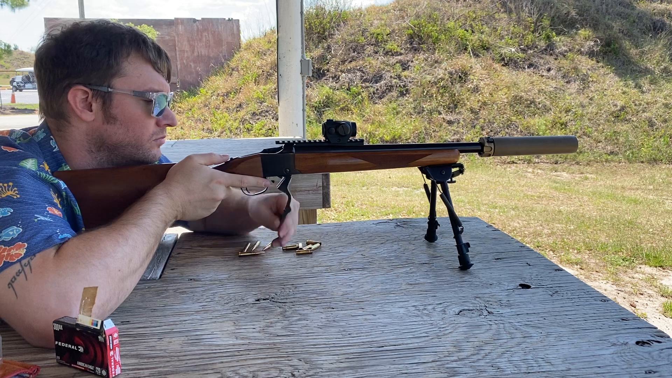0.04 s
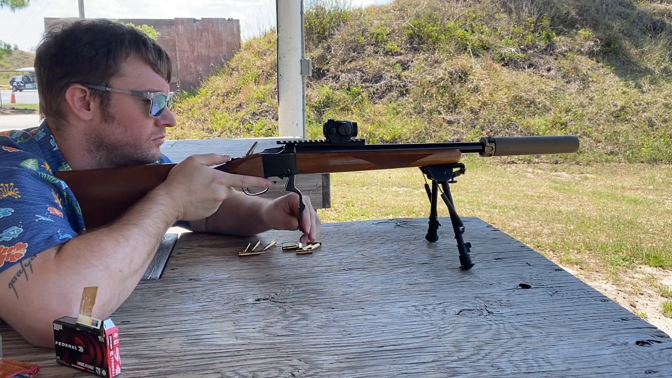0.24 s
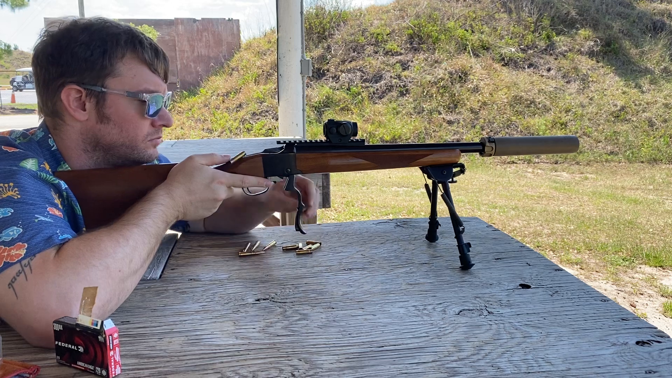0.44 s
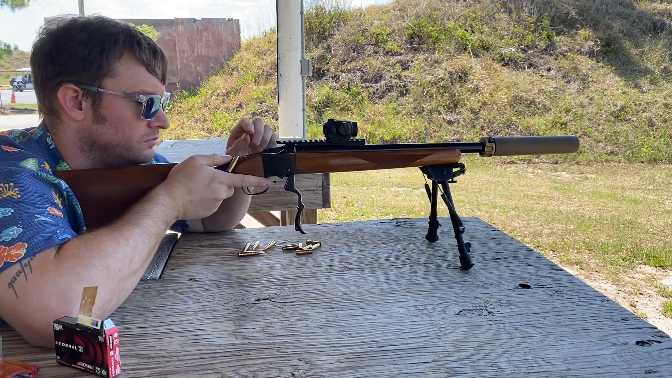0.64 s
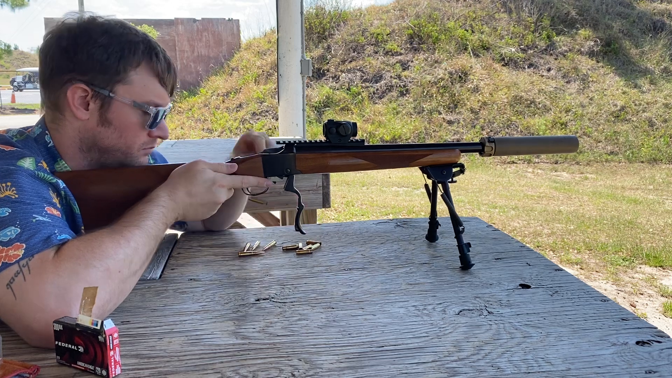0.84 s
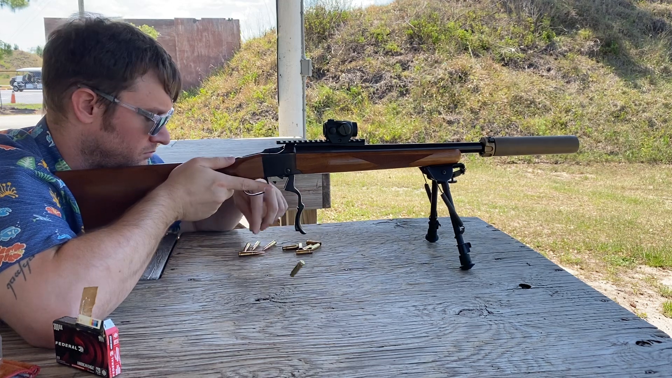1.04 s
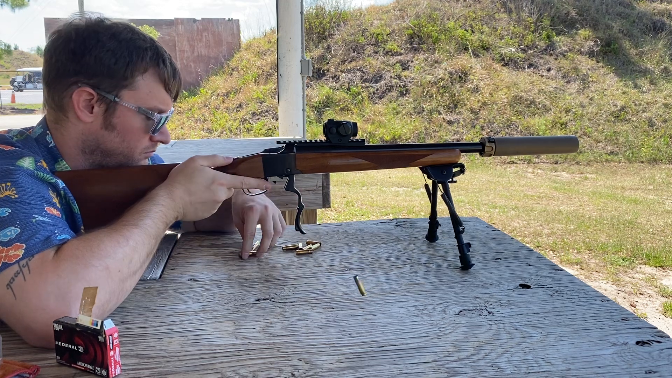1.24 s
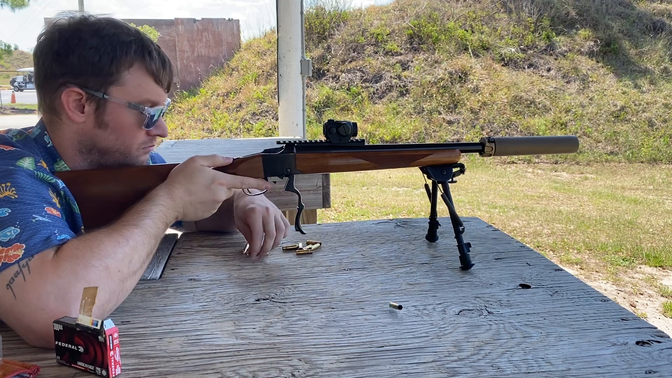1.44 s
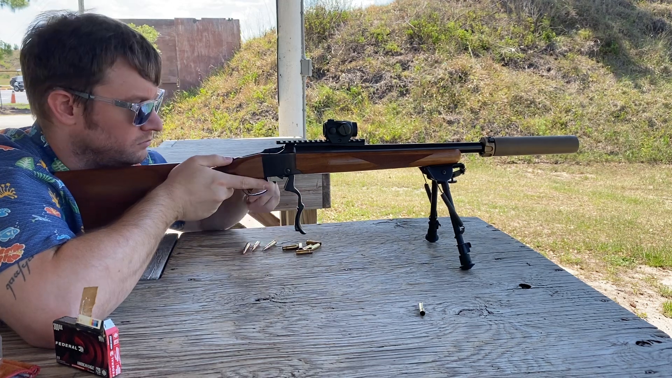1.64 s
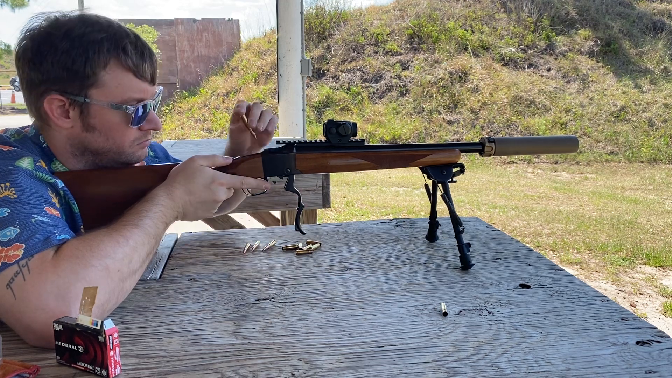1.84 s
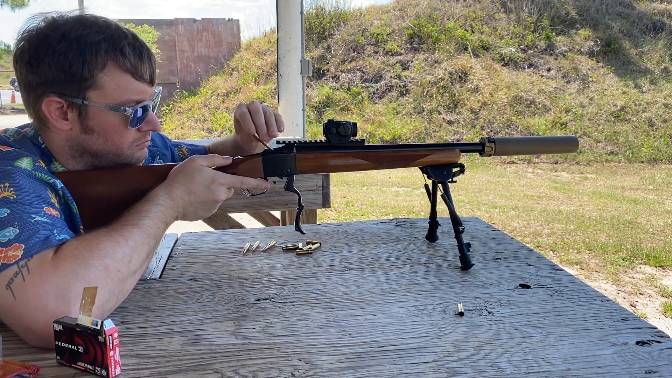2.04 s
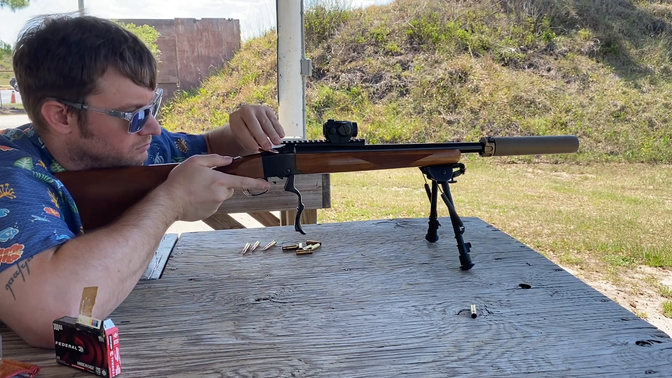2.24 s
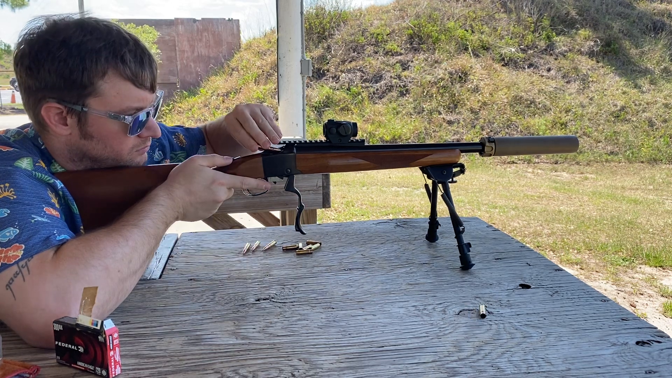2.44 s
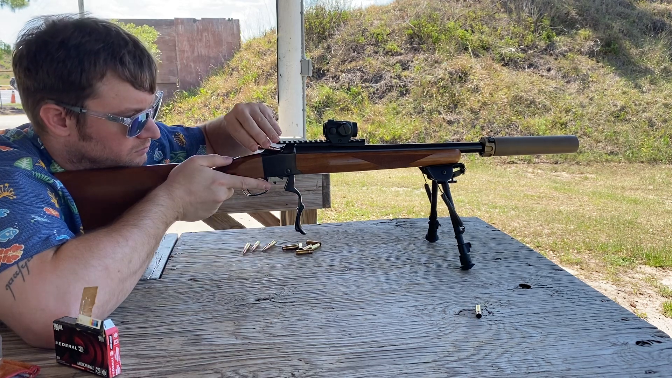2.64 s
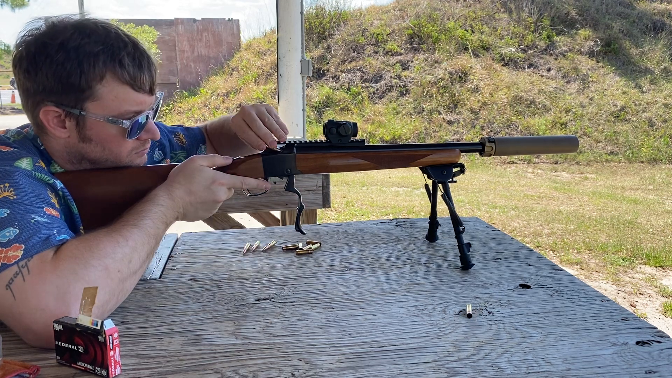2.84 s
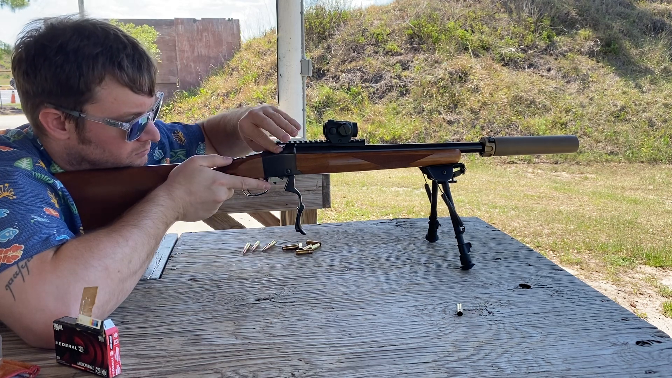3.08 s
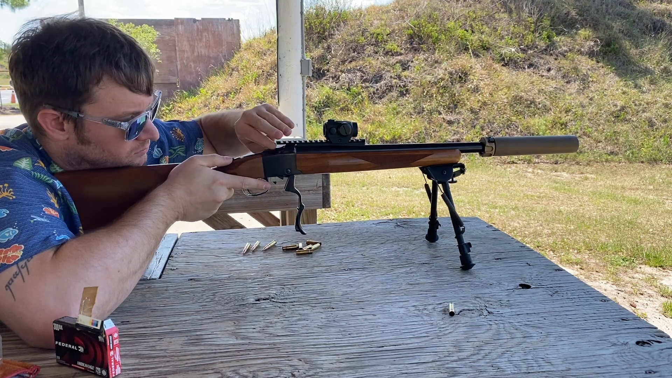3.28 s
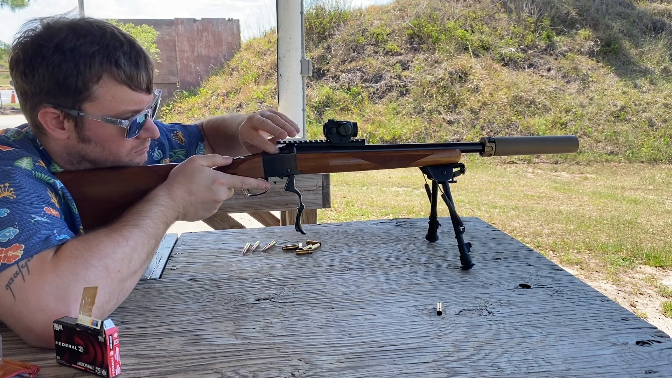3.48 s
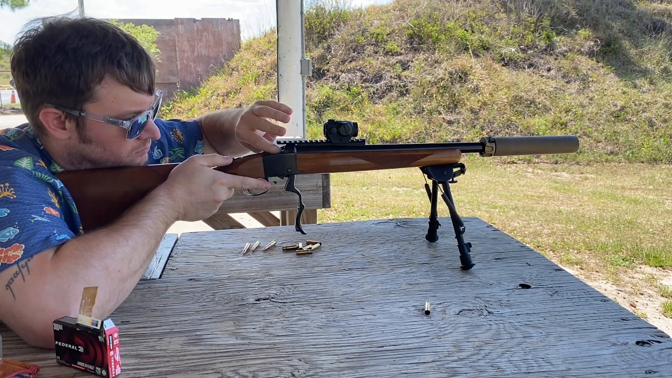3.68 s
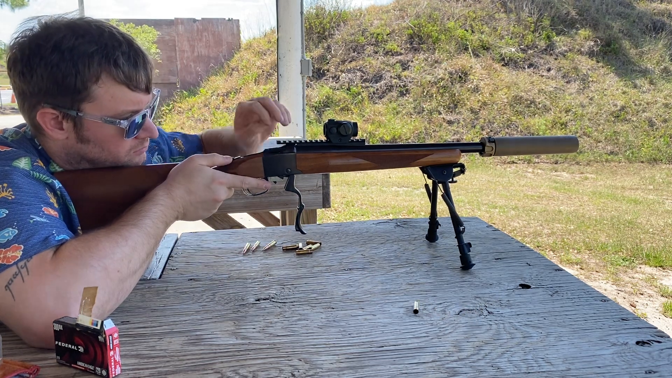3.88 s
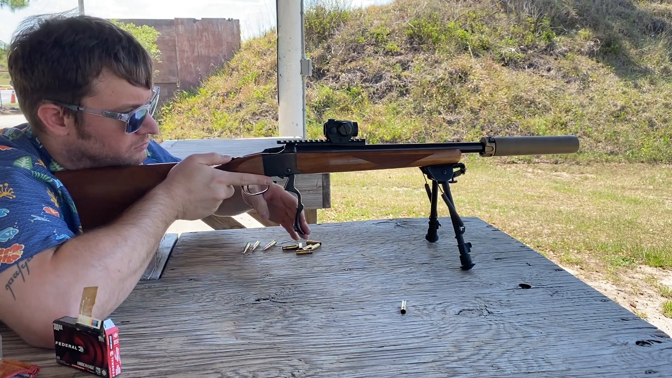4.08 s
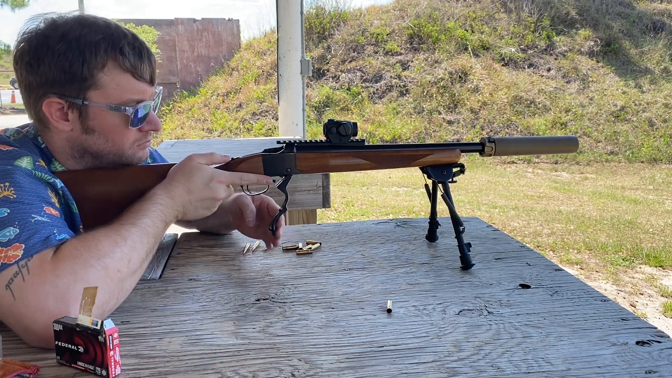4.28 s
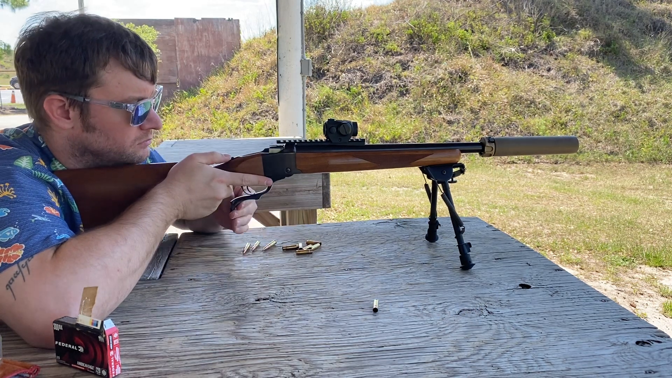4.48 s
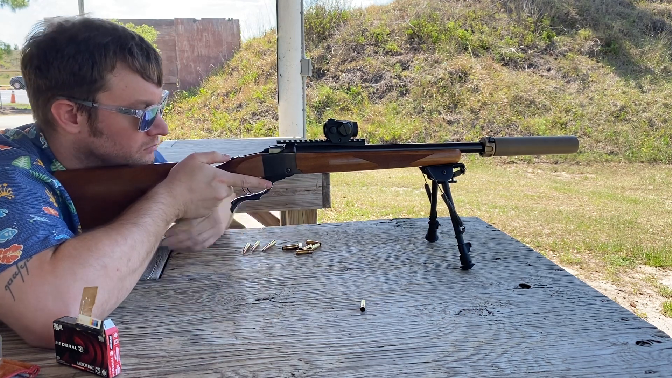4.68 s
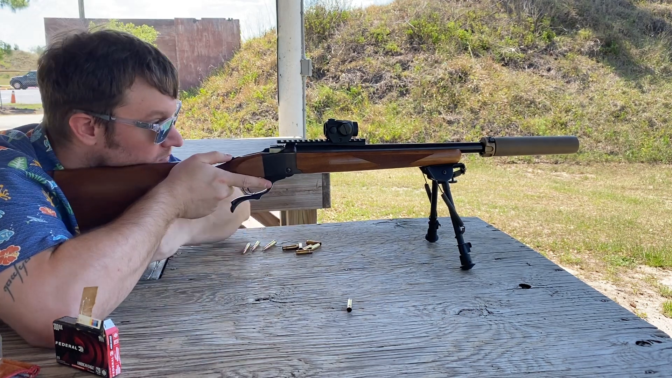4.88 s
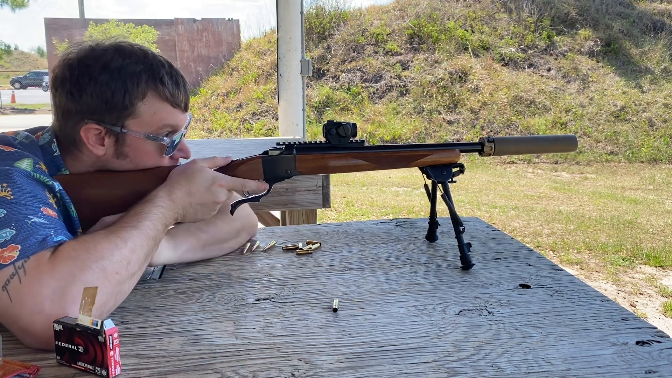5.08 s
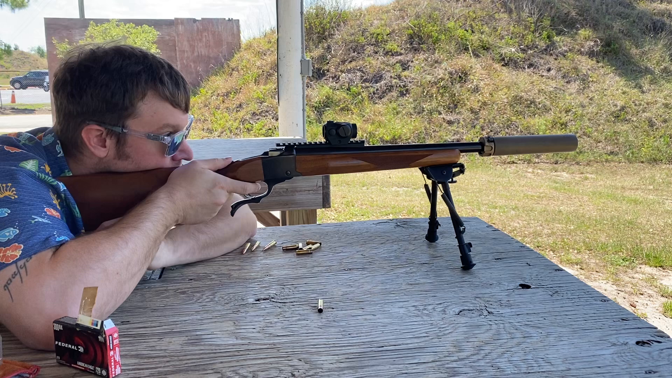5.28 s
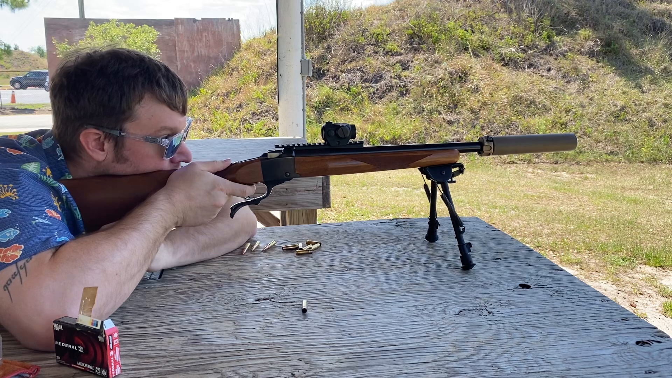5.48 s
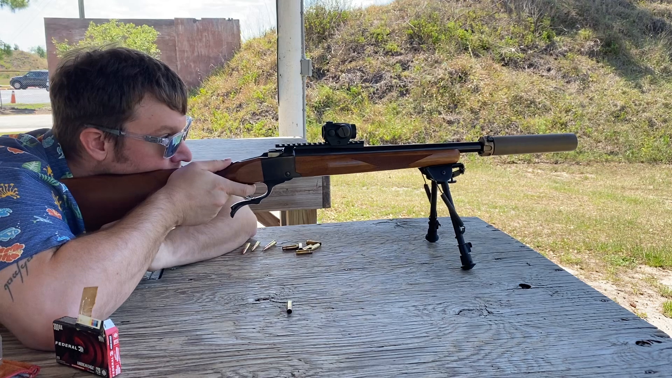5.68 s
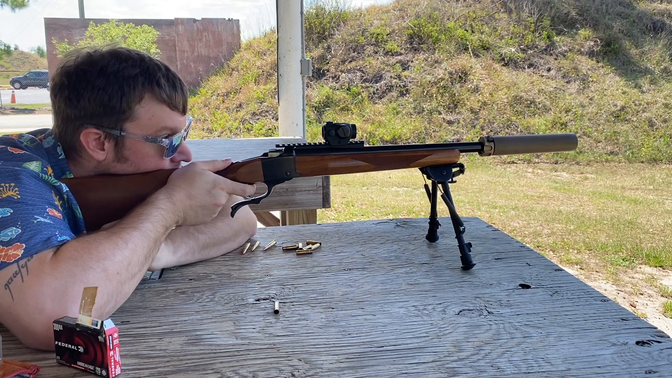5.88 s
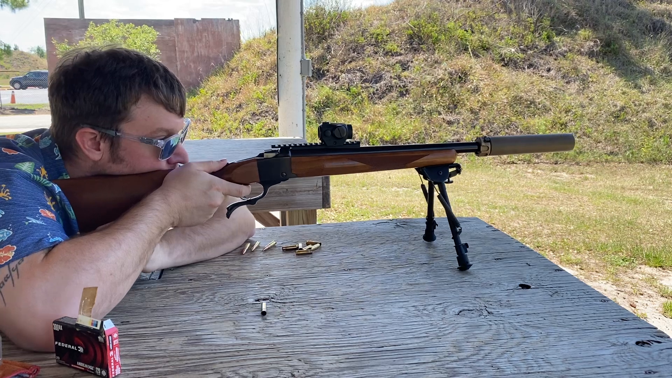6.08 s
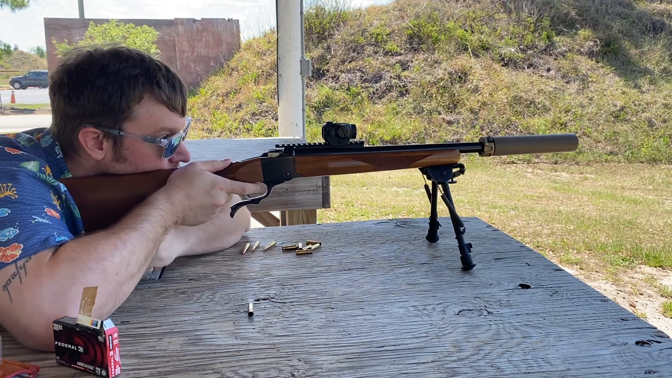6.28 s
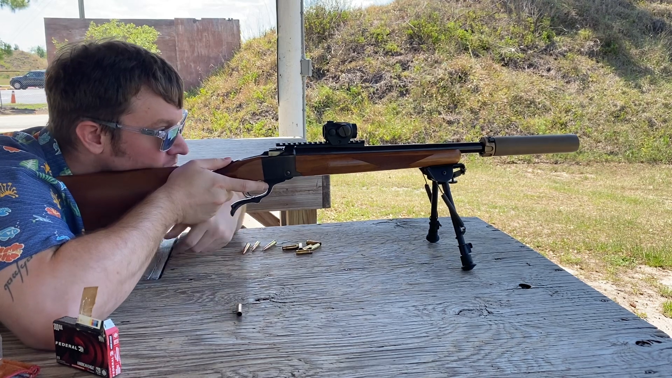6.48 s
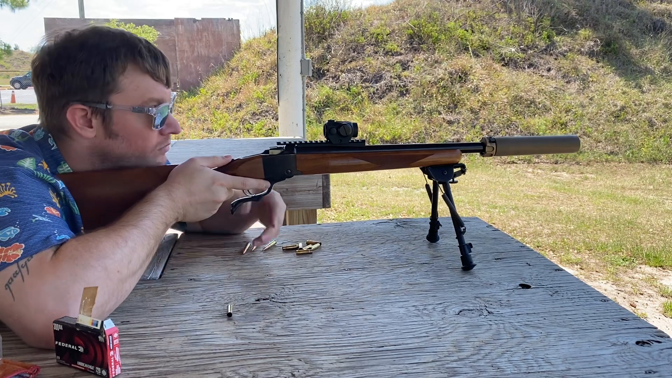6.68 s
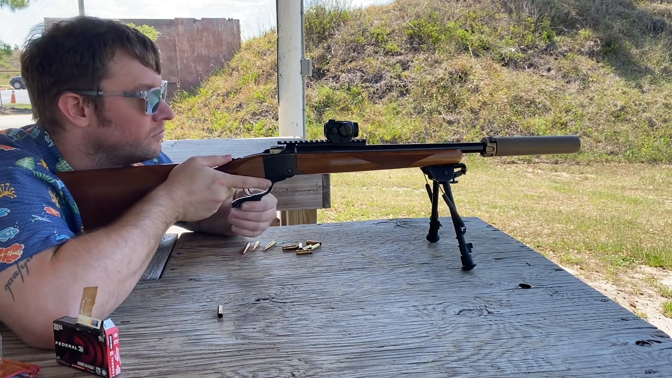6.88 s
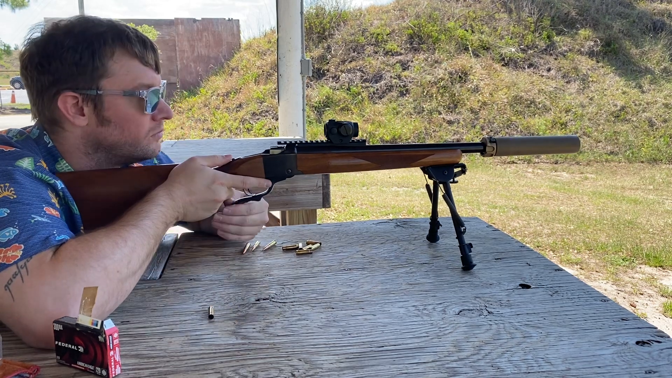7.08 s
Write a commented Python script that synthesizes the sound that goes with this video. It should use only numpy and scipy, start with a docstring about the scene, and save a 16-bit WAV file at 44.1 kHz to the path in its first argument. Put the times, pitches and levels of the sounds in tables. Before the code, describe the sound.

Breezy outdoor range: steel clicks, brass hopping on planks, a round scraping in, a loud breech clack, then a muffled shot with bullet smack and hiss.

```python
"""Breeze buffets the microphone in sinking puffs over an even wash of noise. A rifle's lever opens with steel clicks
and rings, and the spent case slides out ringing, then hops over the bench as knocks and plank modes. A bird gives
drooping sine whistles while a fresh round scrapes in; the breech clacks shut over soft bumps and rubs of hand and
stock. The hammer falls and one suppressed shot follows: spits of gas noise, a short low pressure swing and a hiss.
The bullet smacks home, the earth bank hisses back with a hollow, sinking note, and at last the lever is touched."""
import sys
import numpy as np
from scipy import signal
from scipy.fft import rfft, irfft
from scipy.io import wavfile
from scipy.ndimage import uniform_filter1d

SR = 44100
rng = np.random.default_rng(int(sys.argv[2]) if len(sys.argv) > 2 else 0)


def persist_wave(psi):
    """Save psi, clipped to +-1, as 16-bit WAV."""
    counts = np.round(np.clip(psi, -1, 1) * 32767).astype(np.int16)
    wavfile.write(sys.argv[1], SR, np.atleast_2d(counts).T)


N = 313992
TIME = np.arange(N) / SR
AGE = TIME[:SR // 2]  # time since a blow, in seconds


def undb(db):
    """Decibels to gain."""
    return 10 ** (np.asarray(db) / 20)


def unit(x):
    """Scale to rms 1."""
    return x / np.sqrt(np.mean(x ** 2))


def curve(rows):
    """Join (seconds, value) rows by straight lines."""
    return np.interp(TIME, *np.transpose(rows))


def add(out, s, x):
    """Mix a sound in at a given time in seconds."""
    i = int(s * SR)
    out[:, i:i + x.shape[-1]] += x[..., :N - i]


def colour(x, points):
    """Filter noise to follow (Hz, dB) points; the filter has unit power, so only the shape counts."""
    size = 2048
    hz, db = np.transpose(points)
    grid = np.maximum(np.arange(size // 2 + 1) * SR / size, 1)
    level_db = np.interp(np.log(grid), np.log(hz), db)
    # folding the cepstrum gives a filter that acts as early as it can (minimum phase)
    cepstrum = irfft(np.log(undb(level_db)))
    cepstrum[1:size // 2] *= 2
    cepstrum[size // 2 + 1:] = 0
    response = irfft(np.exp(rfft(cepstrum)))
    response /= np.linalg.norm(response)
    return signal.fftconvolve(x, response[None], axes=1)[:, :x.shape[1]]


def band(x, hz, kind):
    """Gentle low-pass or high-pass."""
    return signal.sosfilt(signal.butter(2, min(hz, SR / 2 - 1), kind, fs=SR, output="sos"), x)


def lift_above(points, bright_db, low_hz, high_hz):
    """Add brightness to the dB column of a table, none below low_hz and all of it above high_hz."""
    return [(hz, db + bright_db * np.interp(hz, [low_hz, high_hz], [0, 1]), *rest) for hz, db, *rest in points]


def noise(size, side_db):
    """Left and right noise; side_db sets how much the ears differ."""
    mid, side = rng.standard_normal((2, size))
    return unit(mid + undb(side_db) * side * np.array([[1], [-1]]))


def walk(rate):
    """Smooth random wandering with a spread of 1, taking about `rate` new values a second."""
    k = int(SR / rate)
    steps = np.repeat(rng.standard_normal(N // k + 1), k)[:N]
    return unit(uniform_filter1d(steps, k))


def burst(decay_s, side_db, grain_db=3):
    """A dying spray of noise whose strength changes every millisecond, like tiny uneven impacts."""
    sizes = np.clip(rng.standard_normal(len(AGE)), -2, 2)
    grains = np.repeat(undb(grain_db * sizes), repeats=SR // 1000)[:len(AGE)]
    # the first contact is firm, the chatter after it is uneven
    grains = 1 + (unit(grains) - 1) * (1 - np.exp(-AGE / 0.009))
    return noise(len(AGE), side_db) * grains * np.exp(-AGE / max(decay_s, 1 / SR))


def ring(modes, spread, uneven_db=2, detune=0):
    """Damped sine modes; each blow weights and may shift them anew, and each ear gets its own phase."""
    out = np.zeros((2, len(AGE)))
    for hz, db, t60 in modes:
        age = AGE[:int(t60 * SR)]
        lean, weight, shift = rng.standard_normal(3)
        phase = spread * lean * np.array([[1], [-1]]) / np.sqrt(2)
        gain = undb(db + uneven_db * np.clip(weight, -1.5, 1.5))
        tone = np.sin(2 * np.pi * hz * (1 + detune * shift) * age + phase)
        out[:, :len(age)] += gain * tone * np.exp(-np.log(1000) * age / t60)
    return out


def from_right(x, count):
    """The left channel hears it a few samples later."""
    return np.array([np.roll(x[0], count), x[1]])


def off_axis(x):
    """Wood radiates the lows broadly; the treble comes straight from the metal, to the right."""
    body = signal.sosfiltfilt(signal.butter(2, 4000, fs=SR, output="sos"), x)
    return body + from_right(x - body, count=8)


def shelter(x, wet_db, t60_low, t60_high, split_hz=5000, build_s=0.0036):
    """Dense reflections from bench, posts and roof; lows and treble die at their own rates."""
    scatter = noise(len(AGE), -0.38)
    low = band(scatter, split_hz, "low") * np.exp(-np.log(1000) * AGE / t60_low)
    high = band(scatter, split_hz, "high") * np.exp(-np.log(1000) * AGE / t60_high)
    response = (low - high) * (1 - np.exp(-(AGE / build_s) ** 2))
    response /= np.linalg.norm(response, axis=1, keepdims=True)
    return x + undb(wet_db) * signal.fftconvolve(x, response, axes=1)[:, :N]


# Tone of distant traffic and leaves. Each row: pitch in Hz, relative level in dB.
AIR_COLOUR = [(25, -11.5), (60, 5), (110, -4.5), (180, -14.5), (240, 2), (310, -8), (390, -5.5), (550, -11),
              (1100, -17), (1700, -24.5), (3000, -29), (7000, -40), (11000, -51.5), (13000, -59),
              (16000, -71)]
AIR_DB = -52.5


def air():
    """The even wash of distant traffic and leaves, as filtered noise that barely wavers."""
    return colour(noise(N, -0.65), AIR_COLOUR) * undb(AIR_DB + 0.17 * walk(11))


# How strong the breeze is over time. Each row: time in seconds, relative level in dB.
BREEZE_STRENGTH = [(0.0, -50), (0.32, -58), (0.81, -54.5), (1.31, -42), (1.55, -42.5), (1.74, -52.5),
                   (1.98, -50), (2.16, -45), (2.87, -46), (3.05, -52), (4.58, -46.5), (4.94, -55),
                   (5.21, -57.5), (5.57, -44), (6.11, -53.5), (6.54, -47), (6.84, -51), (7.12, -46)]
# Tone of its rumble. Each row: pitch in Hz, relative level in dB.
RUMBLE_COLOUR = [(20, -14.5), (35, -5.5), (58, 5.5), (100, -1.5), (200, -10.5), (320, -13.5), (500, -18),
                 (1000, -44.5), (3000, -70.5)]
# The strongest puffs. Each row: start in seconds, relative level in dB, starting pitch in Hz, length in seconds.
STRONG_PUFFS = [(0.222, -32.5, 250, 0.039), (0.488, -32, 358, 0.039), (0.508, -28, 402, 0.038),
                (0.835, -33.5, 354, 0.039), (0.885, -34.5, 364, .025), (1.14, -34, 304, 0.036),
                (1.607, -26.5, 415, 0.039), (1.672, -31.5, 216, 0.043), (1.974, -31, 417, 0.032),
                (2.103, -25.5, 559, 0.043), (2.14, -33.5, 430, 0.014), (2.218, -35, 325, .025),
                (2.24, -31.5, 385, 0.028), (2.275, -32, 172, 0.031), (2.38, -37, 257, .03),
                (2.44, -38, 413, 0.018), (2.486, -29.5, 482, 0.043), (2.57, -28.5, 631, 0.022),
                (2.588, -26, 530, 0.052), (2.658, -35, 276, 0.025), (2.722, -32, 738, 0.02),
                (2.748, -29.5, 319, 0.048), (2.862, -35.5, 328, 0.034), (2.994, -28, 703, 0.039),
                (3.01, -29, 330, 0.031), (3.256, -27, 365, 0.05), (3.295, -31, 450, 0.038),
                (3.32, -32, 473, 0.018), (3.34, -24, 427, 0.036), (3.377, -28.5, 470, 0.034),
                (3.505, -26, 557, 0.055), (3.733, -30.5, 320, 0.038), (3.958, -31, 260, 0.033),
                (4.318, -24.5, 254, 0.038), (4.676, -29, 338, 0.026), (4.695, -23, 370, 0.03),
                (5.735, -31, 275.6, 0.028), (6.37, -31.5, 313, 0.025), (6.545, -32, 251, 0.037),
                (6.915, -33, 269, 0.043)]
# Churning inside a puff. Each row: pitch in Hz, relative level in dB.
CHURN_COLOUR = [(20, -2.5), (60, 6), (150, 3.5), (280, -3), (550, -16), (1300, -49.5), (4000, -72.5)]
BREEZE_DB = -0.5
# lesser puffs at random times; their level is relative to the breeze
EDDIES_PER_S, EDDY_DB, EDDY_HZ, EDDY_SPREAD_OCTAVES, EDDY_S = 5.6, 6, 279, 0.65, 0.022
# the small, quick swirls arrive first, the large ones after
PUFF_SINK_S, PUFF_END_HZ = 0.012, 43


def breeze(ragged_db=-10):
    """Eddies pass the microphone as low puffs that sink quickly in pitch, over a restless rumble."""
    strength_db = curve(BREEZE_STRENGTH)
    out = colour(noise(N, -9.0), RUMBLE_COLOUR) * undb(strength_db + BREEZE_DB + 3.88 * walk(20))
    eddies = []
    for when, pitch in rng.random((int(EDDIES_PER_S * N / SR), 2)):
        start_hz = EDDY_HZ * 2 ** (EDDY_SPREAD_OCTAVES * (2 * pitch - 1))
        eddies.append((when * N / SR, strength_db[int(when * N)] + EDDY_DB, start_hz, EDDY_S))
    t = AGE[:SR // 8]
    for s, db, start_hz, length_s in list(STRONG_PUFFS) + eddies:
        hz = PUFF_END_HZ + (start_hz - PUFF_END_HZ) * np.exp(-t / PUFF_SINK_S)
        phase = 2 * np.pi * (np.cumsum(hz) / SR + rng.random()) + 0.51 * rng.standard_normal((2, 1))
        passage = t / (0.44 * length_s)
        swell = passage * np.exp((1 - passage ** 2) / 2)  # full strength when passage is 1
        churn = undb(ragged_db) * colour(noise(len(t), -7.0), CHURN_COLOUR)
        add(out, s, undb(db - 2.5) * swell * (np.sin(phase) + churn))
    return out


# Tone of a steel click. Each row: pitch in Hz, relative level in dB.
STEEL_COLOUR = [(150, -17.5), (370, -2), (840, -5.5), (1370, -7.5), (2200, -2), (2700, -1.5), (3900, -7),
                (5500, -5.5), (8900, -2.5), (11300, -1.5), (13300, -16.5), (15000, -0.5), (16500, -17)]
# Ring of the receiver and lever. Each row: pitch in Hz, relative level in dB, time to fall 60 dB in seconds.
RECEIVER_MODES = [(376, 2.5, .12), (560, -5.5, .09), (938, -1, 0.16), (2130, 2.5, 0.088),
                  (2438, -1.5, 0.056), (2690, 1, 0.066), (3520, -8, 0.055), (4660, -7.5, 0.068),
                  (5320, -4.5, 0.088), (5640, -8, .06), (7080, -6.5, 0.045), (10900, -11.5, .05),
                  (14570, -10, .06)]
# a blow with more body lasts longer: the time doubles for every so many dB of body
CONTACT_S, CONTACT_DOUBLING_DB = 0.0061, 12


def action_blow(db, treble_db, body_db):
    """One steel contact: a click and the ring of the receiver, both tilted to the same balance."""
    tilt = np.log([900, 2200, 5000, 10000, 15000]), [body_db, 0, 0, treble_db, 1.5 * treble_db]
    shape = [(hz, level + np.interp(np.log(hz), *tilt)) for hz, level in STEEL_COLOUR]
    modes = [(hz, level + np.interp(np.log(hz), *tilt), t60) for hz, level, t60 in RECEIVER_MODES]
    contact_s = CONTACT_S * 2 ** (body_db / CONTACT_DOUBLING_DB)
    click = off_axis(colour(burst(contact_s, -6.0), shape))
    tone = ring(modes, 1.0, uneven_db=7.0, detune=.012)
    return undb(db) * (undb(-5.5) * click + undb(-32.5) * tone)


# Steel parts meeting: the lever opens, the case slides out, a fresh round finds the chamber, a thumb seats it,
# the breech closes, the hammer falls and the lever is touched.
# Each row: start in seconds, relative level in dB, extra treble in dB, extra body in dB.
ACTION_BLOWS = [(0.0603, -18, -1, -7.5), (0.0907, -17, 3.5, -9.5), (0.104, -36, -5, 15.5),
                (0.1368, -36, -4.5, -0.5), (0.1448, -17, 2.5, -6), (0.2103, -35, 5.5, -16),
                (0.2618, -24.5, 3, -19), (0.3202, -31.5, -7, -2), (0.3707, -25, 3.5, -18),
                (0.4738, -34.5, 8, -19), (0.5475, -41.5, -5, -13), (2.081, -40.5, -30, 13.5),
                (2.1, -50, -3, -4), (2.1109, -34, -3.5, -1), (2.13, -35.5, -6, -9.5),
                (2.814, -39.5, -5, -12), (3.003, -44.5, -14, 14), (3.0489, -47, -16.5, 22),
                (3.5074, -35.5, -7.5, 1), (3.5225, -31, -26, -23), (3.5522, -36, -16.5, -9),
                (4.2294, -32, -18, 0.5), (4.243, -39, -6, -4.5), (4.325, -41.5, 5, 10),
                (4.3313, -12, 1, -8), (4.335, -23, -5.5, 5.5), (4.3649, -7, -1.5, -7.5),
                (4.3681, -16, -2, 10), (4.382, -36.5, -1.5, 7), (6.002, -16.5, -6, 4.5),
                (7.019, -33, 3.5, 2.5)]
# Hammer and seated round strike the breech block. Each row: start in seconds, relative level in dB.
BREECH_BLOCK_BLOWS = [(3.5508, -39.5), (4.2289, -46), (6.002, -28)]
# Ring of that block. Each row: pitch in Hz, relative level in dB, time to fall 60 dB in seconds.
BREECH_BLOCK_MODES = [(2117, -1, .05), (2210, -8, .06), (6600, -7, 0.028)]


def action():
    """Lever, block, cartridge and hammer: short steel contacts that ring the receiver."""
    out = np.zeros((2, N))
    for s, db, treble_db, body_db in ACTION_BLOWS:
        add(out, s, action_blow(db, treble_db, body_db))
    for s, db in BREECH_BLOCK_BLOWS:
        add(out, s, undb(db) * ring(BREECH_BLOCK_MODES, 0.7, uneven_db=3.5))
    return shelter(out + spring(), wet_db=-8, t60_low=0.27, t60_high=0.082)


# Brass and sleeve dragging over steel and wood.
# Each row: start in seconds, length in seconds, relative level in dB, extra brightness in dB.
RUB_STROKES = [(0.092, 0.22, -62, 16), (0.325, 0.22, -64, 16), (1.387, 0.38, -50.5, -22),
               (3.03, 0.14, -60.5, -5), (3.72, 0.095, -63, -21), (3.867, 0.057, -52, -46),
               (4.738, 0.036, -52, -28), (4.809, 0.5, -63.5, -28), (5.346, 0.45, -62.5, -16.5),
               (5.705, 0.04, -47.5, -15)]
# Tone of the rubbing. Each row: pitch in Hz, relative level in dB.
RUBBING_COLOUR = [(250, -12), (700, 8.5), (1100, 1.5), (1600, -2), (2200, -10.5), (3200, -5.5), (5000, -9),
                  (8000, -15), (12000, -27.5), (16000, -40.5)]


def rubbing(slips_per_s=1800, uneven_db=3):
    """Stick and slip: a dense, ragged train of tiny releases for each stroke."""
    out = np.zeros((2, N))
    for s, length_s, db, bright_db in RUB_STROKES:
        slips = rng.random(len(AGE)) < slips_per_s / SR
        slips = slips * undb(uneven_db * np.clip(walk(150)[:len(AGE)], -2, 2))
        shape = lift_above(RUBBING_COLOUR, bright_db, 1500, 4500)
        stroke = np.sqrt(np.abs(np.sin(np.pi * np.minimum(AGE / length_s, 1))))
        add(out, s, undb(db) * stroke * unit(colour(slips * noise(len(AGE), -1.9), shape)))
    return shelter(out, wet_db=-7.5, t60_low=0.14, t60_high=0.17)


# Soft bumps of hand and stock.
# Each row: start in seconds, relative level in dB, contact time in seconds, relative level of the stock's ring in dB.
STOCK_BUMPS = [(0.107, -52, .004, -31.5), (2.284, -41.5, 0.007, -64), (2.575, -69, .008, -41.5),
               (2.724, -48, 0.0018, -50), (3.87, -46.5, 0.0057, -63), (3.905, -63, .008, -59),
               (4.096, -43.5, 0.0043, -33), (4.128, -62, .004, -38.5), (4.367, -30, 0.0045, -36),
               (4.745, -49, 0.006, -69), (5.359, -45, .006, -59), (5.444, -45, 0.0055, -50),
               (5.537, -48, .008, -67), (5.705, -30, 0.0025, -63), (5.718, -36, .004, -54)]
# Ring of the stock. Each row: pitch in Hz, relative level in dB, time to fall 60 dB in seconds.
STOCK_MODES = [(366.3, -2.5, 0.36), (389, 0, 0.13), (467, -6.5, 0.071), (690, -24.5, .06)]
# Tone of a bump. Each row: pitch in Hz, relative level in dB.
SOFT_BUMP_COLOUR = [(150, -10), (500, -8.5), (900, 3), (1600, 3), (2400, -6), (3200, -12), (4000, -20),
                    (8000, -30.5), (16000, -45.5)]


def handling():
    """Hands bump the wooden stock: a soft burst of noise, and the ring of the wood."""
    out = np.zeros((2, N))
    for s, db, contact_s, ring_db in STOCK_BUMPS:
        bump = undb(db - 7.0) * colour(burst(contact_s, -8.5), SOFT_BUMP_COLOUR)
        add(out, s, bump + undb(ring_db - 4.5) * ring(STOCK_MODES, 0.21))
    return shelter(out, wet_db=-10, t60_low=0.2, t60_high=0.16)


# The lever's spring slips as the breech opens. Each row: start in seconds, relative level in dB.
SPRING_SLIPS = [(0.1442, -32.5), (0.158, -50), (0.209, -37.5), (.239, -54), (0.249, -49), (0.254, -46.5),
                (0.262, -63), (.278, -64), (.289, -68), (0.32, -46), (0.3714, -51), (0.39, -45),
                (0.405, -46), (0.415, -51), (.425, -57), (0.461, -52), (0.473, -50)]
# Ring of the spring. Each row: pitch in Hz, relative level in dB, time to fall 60 dB in seconds.
SPRING_RING = [(2270, -8.5, 0.0325), (4380, -9, .06), (4710, -0.5, 0.038), (4850, 5, 0.029),
               (6840, -6, 0.024), (7200, -5.5, .03), (10100, -1.5, .03)]


def spring():
    """Each slip of the opening lever grates briefly and twangs its spring."""
    out = np.zeros((2, N))
    for s, db in SPRING_SLIPS:
        twang = ring(SPRING_RING, 0.73, uneven_db=3, detune=0.035)
        grate = colour(burst(0.00093, 2.5) + undb(-13.5) * burst(.01, -1), STEEL_COLOUR)
        add(out, s, undb(db) * (undb(-3.5) * twang + undb(2.0) * grate))
    return out


# The case rings as it is drawn from the chamber. Each row: start in seconds, relative level in dB.
CASE_DRAWN_RINGS = [(0.146, -39), (0.209, -46), (0.262, -60), (0.339, -50), (0.371, -47.5), (0.415, -55),
                    (0.475, -58)]
# The spent case landing on the bench. Each row: start in seconds, relative level in dB, sharpness in dB,
# relative level of the brass ring in dB, extra bass of the board in dB.
CASE_LANDINGS = [(0.9593, -9, -5.5, -52, -6.5), (1.1132, -18, -6, -53, 2), (1.1947, -20.5, 9, -47, -4),
                 (1.206, -21.5, -11, -48, 5.5), (1.312, -17.5, -5, -81, -3),
                 (1.3454, -21.5, 13, -55.5, 0.5), (1.403, -33.5, -33, -68, 11.5),
                 (1.449, -37.5, -38, -78, 3), (1.476, -23, -16, -77, 2), (1.531, -24, -9, -81, -1),
                 (1.585, -32, 17, -65, 0), (1.61, -39.5, -16, -77, -4), (1.68, -41, -18, -84, 0),
                 (1.701, -35.5, 6, -83, 0), (1.788, -40, 5, -88, 5), (1.869, -46, 18, -72, -4),
                 (1.889, -39.5, -1, -83, 5)]
# Ring of the brass. Each row: pitch in Hz, relative level in dB, time to fall 60 dB in seconds.
BRASS_MODES = [(7430, -20, .3), (8600, 0, .17), (8665, -6, .12), (11670, -21, .12), (12040, -23, .12)]
# Tone of a knock on the bench. Each row: pitch in Hz, relative level in dB.
KNOCK_COLOUR = [(150, -10.5), (260, -8), (370, 1.5), (600, 6.5), (1000, -0.5), (1500, 3), (2200, -2),
                (3200, -6.5), (4400, -16.5), (6000, -19.5), (9000, -23), (12000, -28), (16000, -35)]
# Ring of the planks. Each row: pitch in Hz, relative level in dB, time to fall 60 dB in seconds.
PLANK_MODES = [(342, 0, 0.18), (382, 5, 0.105), (467, 2, 0.12), (556, 3.5, 0.15), (602, -8, 0.1),
               (712, 1.5, 0.17), (962, 6, 0.14), (1108.5, 4, 0.08), (1222, 4.5, 0.0615), (1350, 0.5, 0.17),
               (1690, 5, 0.063), (1870, 6.5, 0.079), (2295, -9, 0.058), (2460, 3.5, 0.081),
               (2680, -20, 0.07), (3395, 2, 0.043)]
FIRM_DB, DULLING = -15.5, 1  # landings weaker than this lose top treble, in dB per dB
BOARD_DB, BOARD_DECAY_S = -10.5, 0.016  # crowded, well-damped modes of the bench top


def landing_tilt(hz, db, sharp_db, bass_db):
    """How one landing changes the level at a pitch, in dB: board bass, sharpness and dulling."""
    bass = bass_db * np.interp(hz, [300, 1200], [1, 0])
    dull = DULLING * min(db - FIRM_DB, 0) * np.interp(hz, [6000, 14000], [0, 1])
    return bass + dull + sharp_db * np.interp(hz, [1820, 4260, 9100, 13600], [0, 0.92, 0.51, 1.0])


def spent_case():
    """The brass case hops end over end: each landing knocks the planks and rings its own mouth."""
    out = np.zeros((2, N))
    for s, db in CASE_DRAWN_RINGS:
        add(out, s, undb(db) * ring(BRASS_MODES, 0.99))
    for s, db, sharp_db, brass_db, bass_db in CASE_LANDINGS:
        balance = db, sharp_db, bass_db
        board = undb(BOARD_DB) * burst(BOARD_DECAY_S, -0.5, grain_db=1.0)
        contact = burst(0.0016, -7.5, grain_db=-23.0) + board + rattle()
        shape = [(hz, level + landing_tilt(hz, *balance)) for hz, level in KNOCK_COLOUR]
        knock = off_axis(colour(contact, shape))
        # every landing spot favours other modes of the planks
        modes = [(hz, level + landing_tilt(hz, *balance), t60) for hz, level, t60 in PLANK_MODES]
        planks = ring(modes, 0.67, uneven_db=3, detune=.06)
        add(out, s, undb(db) * (undb(-1.0) * knock + undb(-23.5) * planks))
        add(out, s, undb(brass_db) * ring(BRASS_MODES, 1.0, uneven_db=-3))
    return shelter(out, wet_db=-13.5, t60_low=0.29, t60_high=0.19)


# loose boards chatter after each landing
RATTLE_S, RATTLE_DB, RATTLE_FALL_DB_PER_S = 0.059, -17, 263


def rattle():
    """Six small contacts follow a landing at random delays, the later the weaker."""
    out = np.zeros((2, len(AGE)))
    for delay_s in RATTLE_S * (0.17 + rng.random(6)):
        gain = undb(RATTLE_DB - RATTLE_FALL_DB_PER_S * delay_s)
        out += gain * np.roll(burst(0.00087, 0.5), int(delay_s * SR), axis=1)
    return out


# Bird whistles.
# Each row: start in seconds, length in seconds, starting pitch in Hz, end pitch in Hz, relative level in dB.
BIRD_WHISTLES = [(2.233, 0.11, 7400, 6500, -62.5), (2.455, 0.18, 7980, 7200, -58),
                 (2.65, 0.061, 7820, 6400, -55), (3.077, 0.059, 7280, 6700, -61),
                 (3.279, 0.07, 7520, 5860, -61), (4.112, 0.12, 7540, 7170, -61.5),
                 (4.65, .135, 7550, 6130, -59.5), (5.537, 0.16, 7750, 7270, -61.5),
                 (5.758, 0.042, 7300, 6800, -65.5), (6.747, 0.095, 7590, 7080, -57)]


def bird():
    """Thin sine whistles that nearly hold their pitch and then droop, with a slight waver."""
    out = np.zeros((2, N))
    for s, length_s, start_hz, end_hz, db in BIRD_WHISTLES:
        u = np.linspace(0, 1, int(length_s * SR))  # progress through the whistle
        hz = start_hz + (end_hz - start_hz) * u ** 2 + 35 * walk(220)[:len(u)]
        swell = np.sqrt(np.abs(np.sin(np.pi * u)))
        add(out, s, undb(db) * np.sin(2 * np.pi * np.cumsum(hz) / SR) * swell)
    return shelter(undb(-10.5) * out, wet_db=3, t60_low=0.3, t60_high=0.18)


# The round scrapes into the chamber in short catches.
# Each row: start in seconds, length in seconds, relative level in dB, extra brightness in dB.
ROUND_SCRAPES = [(2.788, 0.032, -57.5, 2.5), (3.024, 0.059, -48, -2), (3.099, 0.052, -50, -32),
                 (3.497, 0.025, -54, 5)]
# Ring of the chamber. Each row: pitch in Hz, relative level in dB, time to fall 60 dB in seconds.
CHAMBER_MODES = [(982, 2.5, 0.035), (1220, -5, 0.027), (1620, -1.5, 0.027), (2044, 1.5, 0.035),
                 (2500, -11, 0.025), (3240, -9, 0.03), (4000, -8.5, 0.032), (4570, -5, 0.073),
                 (5400, -5, 0.033), (6330, 1, 0.034), (7100, -9, .03), (8500, -7.5, 0.025),
                 (9400, -13, 0.051)]
CATCHES_PER_S, CATCH_SPREAD_DB = 150, 4.5


def scraping():
    """The brass catches and slips on its way in; each catch rings the chamber a little differently."""
    out = np.zeros((2, N))
    for s, length_s, db, bright_db in ROUND_SCRAPES:
        modes = lift_above(CHAMBER_MODES, bright_db, 1500, 4500)
        count = int(length_s * CATCHES_PER_S) + 1
        for k, (late, size) in enumerate(rng.random((count, 2))):
            progress = (k + late) / count
            size_db = CATCH_SPREAD_DB * (2 * size - 1)
            gain = undb(db - 8.5 + size_db) * np.sin(np.pi * progress) ** 0.43
            grit = undb(12.5 + bright_db) * band(colour(burst(0.0013, -2), STEEL_COLOUR), 6400, "low")
            tone = ring(modes, 1.0, uneven_db=6.0, detune=0.028)
            add(out, s + progress * length_s, gain * (tone + grit))
    return shelter(out, wet_db=-4, t60_low=0.17, t60_high=0.062)


# Spits of muzzle gas. Each row: start in seconds, relative level in dB, decay time in seconds.
GAS_SPITS = [(6.0074, -15, 0.0029), (6.0102, -8, 0.0012), (6.014, -21, 0.0035)]
# Tone of the gas. Each row: pitch in Hz, relative level in dB.
MUZZLE_GAS_COLOUR = [(150, -3.5), (350, 4.5), (670, 0.5), (1400, -8.5), (2150, 4.5), (3000, 0), (5000, -6),
                     (9000, -2), (11500, -1), (13300, -8), (15200, 2), (16500, -19)]


def shot():
    """Gas spits from the suppressor, the pressure swing follows, and the recoil shakes the bench."""
    gas = np.zeros((2, N))
    for s, db, decay_s in GAS_SPITS:
        add(gas, s, undb(db + 4.0) * off_axis(colour(burst(decay_s, -0.59), MUZZLE_GAS_COLOUR)))
    add(gas, GAS_SPITS[0][0], wash())
    boom = thump(start_s=6.0124, hz=213, length_s=.0082, db=-4.3, front_db=-3)
    # modes in each ring: Hz, dB, seconds to fall 60 dB
    add(boom, 6.0122, -undb(-18.0) * ring([(617, 3, 0.026), (761, -7, 0.049), (920, -17, 0.046)], 0.31))
    add(boom, 6.016, undb(-26) * ring([(68.5, -15.0, 0.17), (114.0, 12.0, 0.099)], .3, uneven_db=5.0))
    return gas + shelter(boom, wet_db=-31.5, t60_low=0.22, t60_high=0.15)


# Tone of the blast scattered by roof, posts and ground. Each row: pitch in Hz, relative level in dB.
BLAST_WASH_COLOUR = [(150, -4.5), (400, 2.5), (800, -3), (1500, -0.5), (2700, 3), (5000, 0.5), (7000, 1),
                     (9500, -0.5), (11500, 4), (13300, -10), (15200, 1), (16500, -22)]
WASH_DB, WASH_RISE_S, WASH_FALL_DB_PER_S = -17.5, 0.004, 301


def wash(uneven_db=-3.3):
    """Countless reflections of the blast merge into a dense, dying hiss."""
    level_db = WASH_DB - WASH_FALL_DB_PER_S * AGE + uneven_db * walk(400)[:len(AGE)]
    hiss = colour(noise(len(AGE), -0.45), BLAST_WASH_COLOUR)
    return hiss * undb(level_db) * (1 - np.exp(-AGE / WASH_RISE_S))


def thump(start_s, hz, length_s, db, front_db):
    """The pressure swing that leaves the suppressor: a steep front, then under two slow cycles."""
    swell = np.interp(AGE, [0, length_s / 2], [undb(front_db), 1])
    close = np.clip((length_s - AGE) / 0.00094, 0, 1)
    swing = -np.cos(2 * np.pi * hz * AGE + np.pi / 6) * swell * close
    # the air returns to rest, so the swing has no net push
    swing -= close * swing.sum() / close.sum()
    out = np.zeros((2, N))
    add(out, start_s, undb(db) * swing)
    return band(out, 2060, "low")


# The bullet striking down range.
# Each row: start in seconds, relative level in dB, decay time in seconds, extra brightness in dB.
BULLET_STRIKES = [(6.1478, -6, 0.001, -2.5), (6.3658, -17.5, 0.0015, -9)]
# Tone of a strike. Each row: pitch in Hz, relative level in dB.
BULLET_STRIKE_COLOUR = [(300, -11), (1400, 0), (2300, 5.5), (2950, 2), (3700, 10), (5000, -7), (6700, 10.5),
                        (8500, -1), (11000, -5), (16000, -44)]
# Slopes of grass and earth that scatter the shot back.
# Each row: arrival in seconds, relative level of the hiss in dB, relative level of the hollow note in dB.
BANK_SLOPES = [(6.163, -44.5, -62), (6.293, -45, -58), (6.372, -48.5, -52)]
# Tone of the bank's hiss. Each row: pitch in Hz, relative level in dB.
BANK_HISS_COLOUR = [(200, -15.5), (500, -4.5), (900, -8), (1900, -6.5), (3400, -4), (5000, -4.5),
                    (6900, -6.5), (9000, -14), (12000, -17.5), (16000, -35)]
BANK_NOTE_HZ, BANK_NOTE_WIDTH_HZ, BANK_NOTE_SAG_HZ_PER_S = 3800, 1140, 1200
BANK_FALL_DB_PER_S, BANK_NOTE_FALL_DB_PER_S = 103, 66


def down_range():
    """The bullet smacks home, and the bank returns a dulling hiss with a hollow, sinking note."""
    strikes = np.zeros((2, N))
    for s, db, decay_s, bright_db in BULLET_STRIKES:
        shape = lift_above(BULLET_STRIKE_COLOUR, bright_db, 2500, 6500)
        smack = from_right(colour(burst(decay_s, -9.0), shape), count=14)
        add(strikes, s, undb(db - 13.5) * smack)
    hiss = colour(noise(N, -1.9), BANK_HISS_COLOUR) * undb(1.28 * walk(76))
    far = np.interp(TIME, [6.3, 6.6], [0, 1])  # the later echo is duller
    hiss = (1 - far) * hiss + far * band(hiss, 8500, "low")
    hiss = hiss * bank_swell([(s, db) for s, db, _ in BANK_SLOPES], BANK_FALL_DB_PER_S)
    # slow noise times a sinking sine gives a narrow band of noise that sinks with it
    hz = BANK_NOTE_HZ - BANK_NOTE_SAG_HZ_PER_S * np.maximum(TIME - BANK_SLOPES[0][0], 0)
    flutter = band(noise(N, -2.3), BANK_NOTE_WIDTH_HZ / 2, "low")
    note = unit(flutter * np.sin(2 * np.pi * np.cumsum(hz) / SR))
    note = note * bank_swell([(s, db) for s, _, db in BANK_SLOPES], BANK_NOTE_FALL_DB_PER_S)
    return strikes + hiss + note


BANK_RISE_S = 0.022
FAR_FIELD_DB, FAR_FALL_DB_PER_S = -37, 4  # the faint long roll after each echo


def bank_swell(slopes, fall_db_per_s):
    """Each slope's echo rises quickly, dies away and leaves a faint roll; their powers add."""
    power = 0
    for s, db in slopes:
        since = np.maximum(TIME - s, 0)
        rise = np.exp(np.minimum(TIME - s, 0) / BANK_RISE_S)
        echo = undb(-fall_db_per_s * since)
        roll = undb(FAR_FIELD_DB - FAR_FALL_DB_PER_S * since)
        power = power + (undb(db) * rise) ** 2 * (echo ** 2 + roll ** 2)
    return np.sqrt(power)


def scene():
    """All that sounds at the bench."""
    weather = air() + breeze()
    rifle = action() + rubbing() + handling() + scraping() + shot()
    return weather + rifle + spent_case() + bird() + down_range()


TOP_HZ = 16100


def record(dry):
    """The microphone's path sheds the deepest rumble, clips just under full scale and cuts the top."""
    sound = np.clip(band(dry, 35, "high"), -.85, .85)
    return signal.sosfilt(signal.ellip(8, .2, 70, TOP_HZ, fs=SR, output="sos"), sound)


dry = scene()
out = record(dry)
persist_wave(out)
```